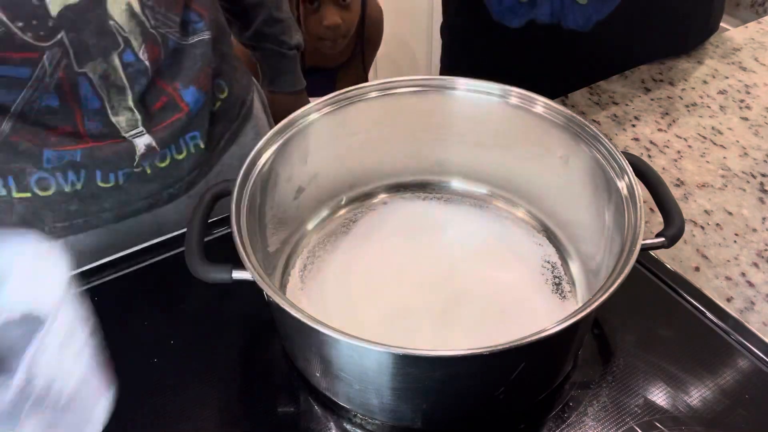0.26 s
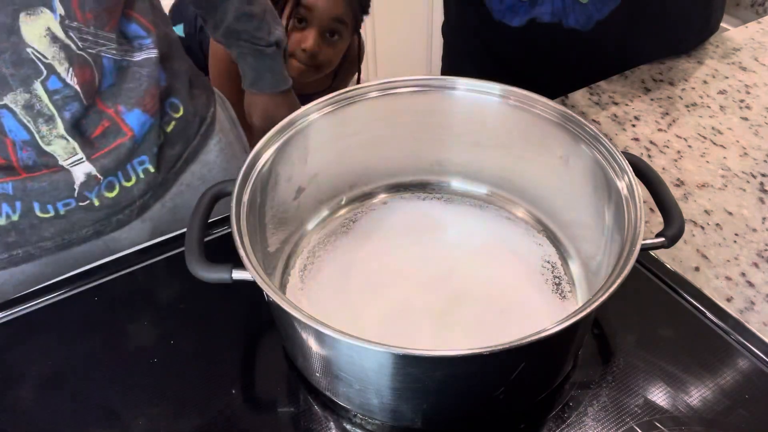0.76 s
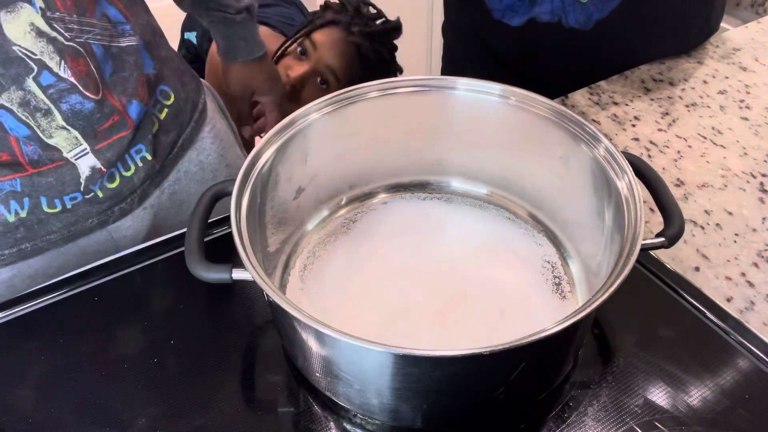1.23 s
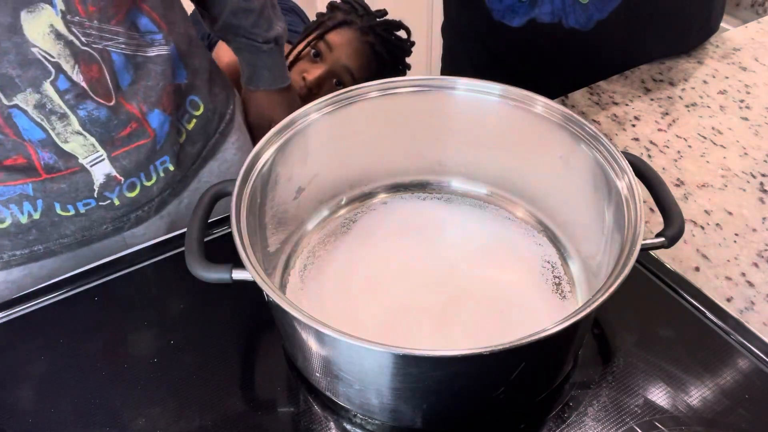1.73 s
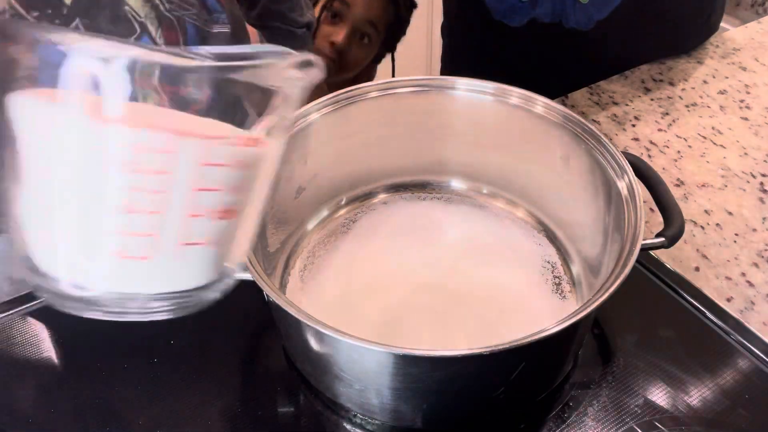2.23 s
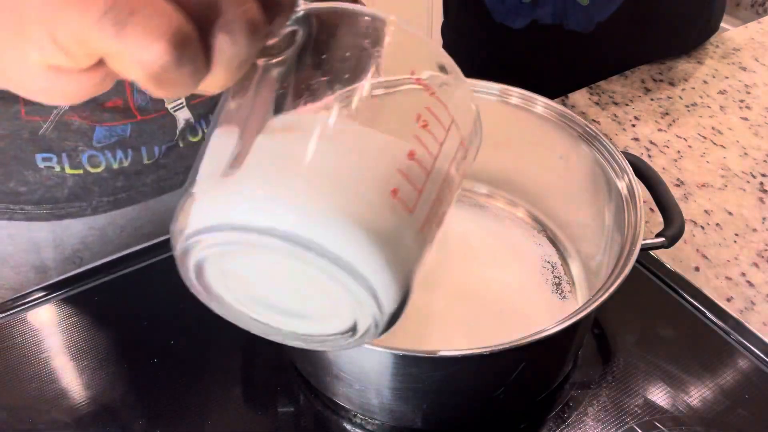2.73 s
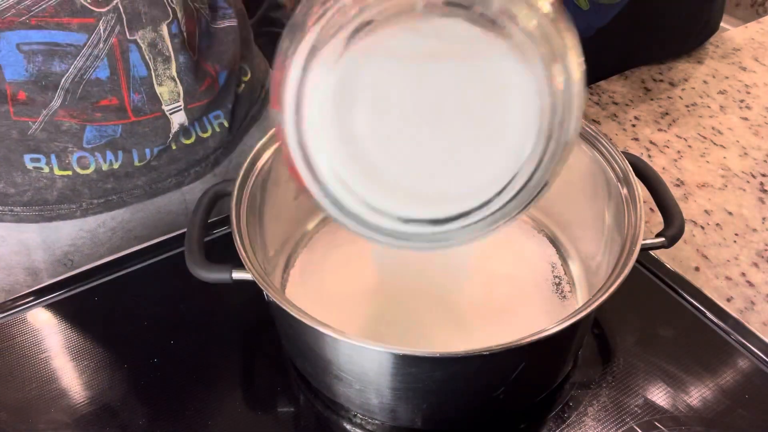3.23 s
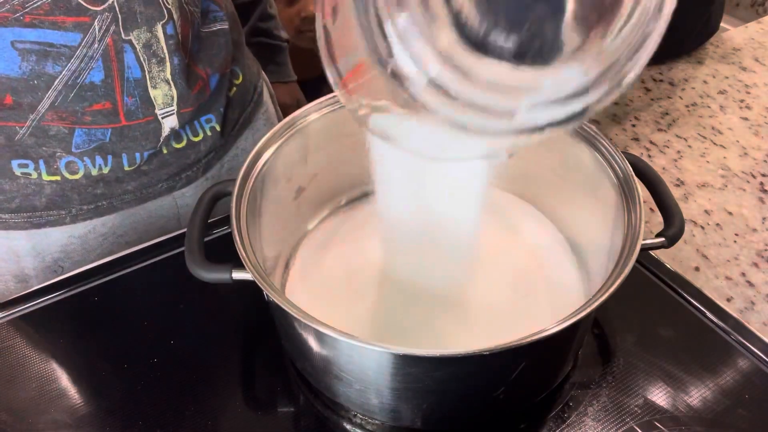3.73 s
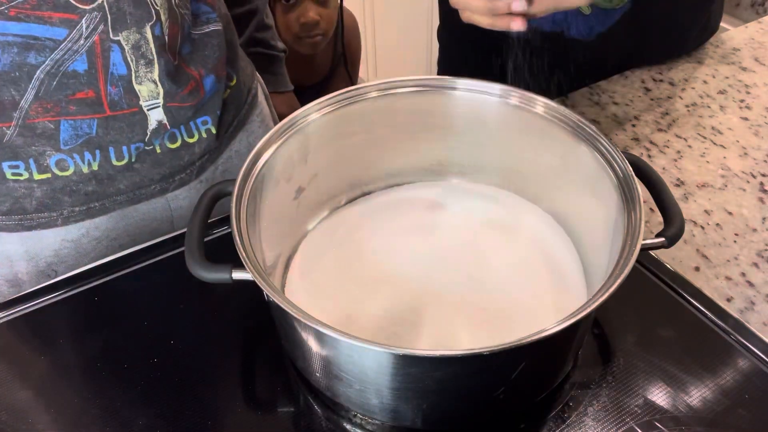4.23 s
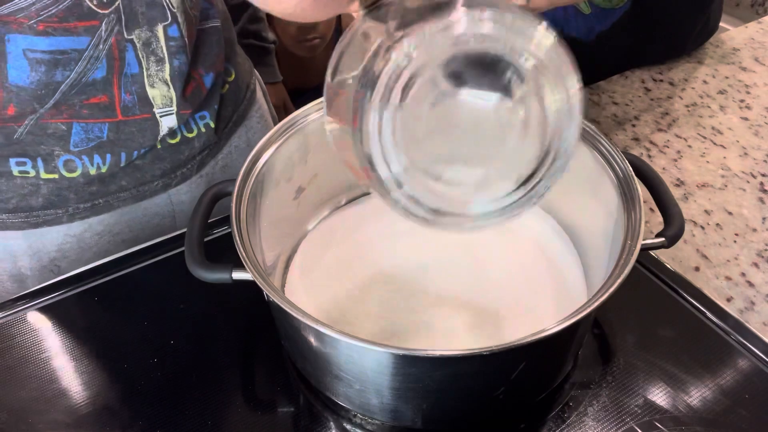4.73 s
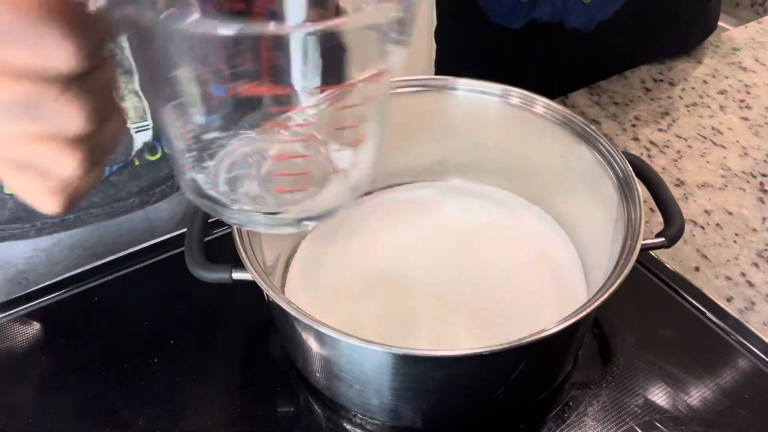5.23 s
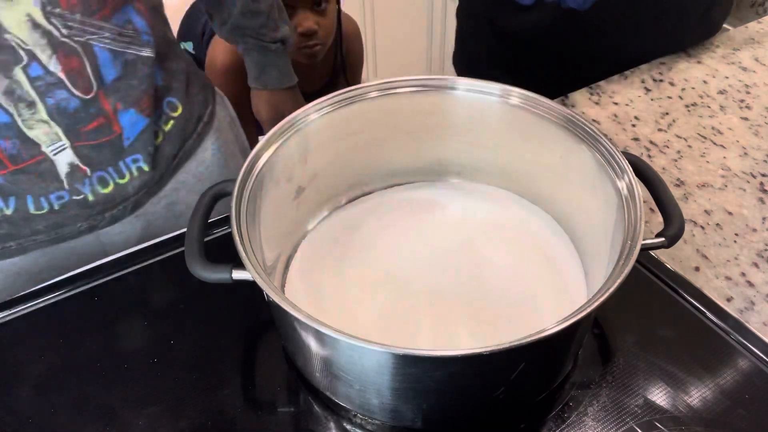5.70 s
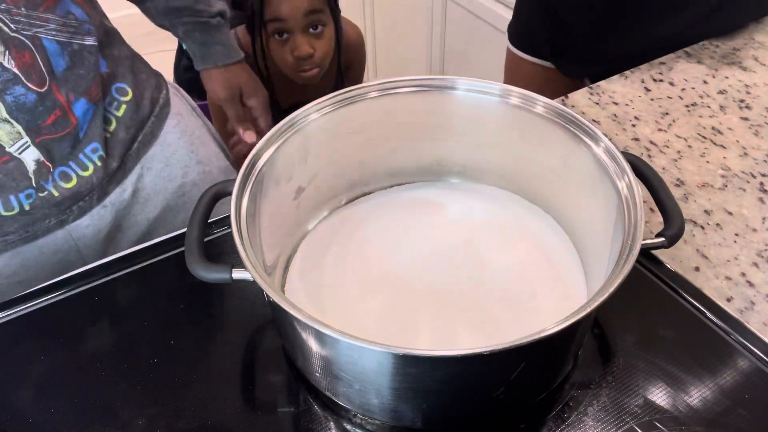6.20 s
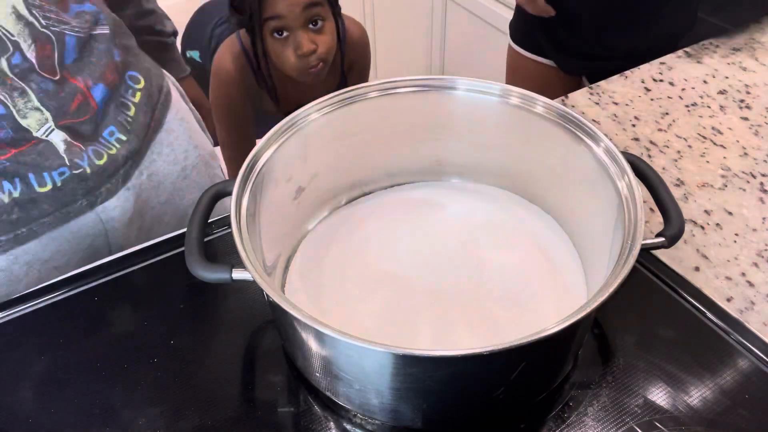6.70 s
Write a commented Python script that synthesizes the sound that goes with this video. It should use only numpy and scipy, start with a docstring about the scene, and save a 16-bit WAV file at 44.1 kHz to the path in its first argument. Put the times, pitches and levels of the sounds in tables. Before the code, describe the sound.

Beside a stove, a low fan drone glides slightly upward and grows stronger and airier. Early on, a light plastic cup knocks and bounces to the left. Faint taps and cloth rustle follow, then a bright, grainy stream of sugar swells and thins for under two seconds. Near the end, a glass cup lands on stone with hard double knocks, a rocking clink and short ring in a lively kitchen.

```python
"""In a small kitchen, sugar is poured from a glass cup onto sugar in a steel pot, beside a stove fan that speeds up.
First an empty plastic cup is put down and bounces; last, the glass cup knocks, rocks and rings on the stone counter.
Grains are sparse random impacts; knocks are noise bursts that drive a coloured body, with decaying modes as the ring.
The fan is coloured noise with gliding tones. Clothes rustle, handling taps, and thin squeaks are faint."""
import sys
import numpy as np
from scipy import signal
from scipy.fft import rfft, irfft, next_fast_len
from scipy.io import wavfile
from scipy.ndimage import uniform_filter1d, minimum_filter1d

SR = 44100
rng = np.random.default_rng(int(sys.argv[2]) if len(sys.argv) > 2 else 0)


def to_wav(s):
    """Save 16-bit WAV."""
    ch = np.atleast_2d(s).T  # columns
    pcm = np.round(np.clip(ch, -1, 1) * 32767)  # PCM
    wavfile.write(sys.argv[1], SR, pcm.astype(np.int16))


N = 306936
TIME = np.arange(N) / SR
AGE = TIME[:SR]   # seconds since a blow
EAR_DELAY_S = .00043   # between the ears, for a sound from one side

# Stereo width of knocks, taps and cloth. Each row: frequency in Hz, side relative to mid in dB.
KNOCK_WIDTH = [(60, -13.5), (170, -11), (400, -2.5), (750, 5.5), (1050, -3), (1400, 4.5), (3500, -1.5),
               (8000, 7), (12000, -14.5)]


def sugar(lumps_db, lumps_per_s):
    """Granular impact noise: crystals strike a soft heap; when the stream thickens, some ring the steel."""
    # Colour of the grains. Each row: frequency in Hz, relative level in dB per Hz.
    grain_spectrum = [(1500, -18), (3200, -6), (5000, 2.5), (7500, -5.5), (9000, -3), (11000, -1.5),
                      (15000, 3), (16500, -1.5)]
    # Resonances of the pot rung by the grains. Each row: centre in Hz, width in Hz, gain in dB.
    pot = [(8100, 150, 5), (9850, 320, 12), (10660, 940, 11), (11940, 320, 11)]
    width = [(3000, -9), (8000, 8.5), (12000, -15)]   # (Hz, side minus mid dB)
    # the stream opens and closes in one arch as the cup tips
    start_s, length_s, pour_db, arch_power = 2.68, 1.77, -77.5, 0.6
    tipped = np.clip((TIME - start_s) / length_s, 0, 1)
    arch = abs(np.sin(np.pi * tipped)) ** arch_power
    # part way through, the heap in the cup slides and the stream thickens for a moment
    slide_s, rise_s, fade_s, slide_db = 3.34, 0.13, 1, 5
    slide = np.interp(TIME - slide_s, [0, rise_s, rise_s + fade_s], [0, 1, 0])
    flow = arch * from_db(slide_db * slide + lumps_db * drift(lumps_per_s))
    crystals = grains(per_s=8700)
    heap = colour(crystals, grain_spectrum, width)
    steel = colour(crystals, grain_spectrum, width, pot)
    return from_db(pour_db) * flow * ((1 - slide) * heap + slide * steel)


def grains(per_s):
    """Shot noise: tiny impacts at random times and of uneven size, scaled to unit power."""
    struck = rng.random((2, N)) < per_s / SR
    return rms_one(white(N) * struck)


def glass_cup():
    """Impact excitation: glass on stone, first held firmly, then let go, so that it rings more."""
    # Contacts with the counter. Each row: start in seconds, knock level in dB, knock tilt in dB per octave,
    # knock t60 in seconds, tail in dB relative to the knock, ring level in dB, ring tilt in dB per octave.
    hits = [(6.2785, -22, -0.5, 0.047, -17, -64, -4), (6.2848, -6.5, -1.5, 0.039, -17.5, -54.5, 4.5),
            (6.3238, -6, 0.6, 0.045, -24.5, -50.5, 4), (6.4925, -16, 0.5, 0.094, -15, -41, 2),
            (6.516, -22, -0.2, 0.091, -13.5, -36, -1.5)]
    # Colour of the knock. Each row: frequency in Hz, relative level in dB per Hz.
    knock_spectrum = [(45, -28), (105, 1.5), (165, 5), (260, -2.5), (400, -0.5), (600, -5.5), (730, 2),
                      (1150, -7.5), (2200, -6), (3500, -13), (4500, -21.5), (5300, -31), (6500, -39),
                      (8500, -74), (15000, -55)]
    # Resonances and dips of the counter and of the glass base pressed on it.
    # Each row: centre in Hz, width in Hz, gain in dB.
    counter_peaks = [(566, 44, -15), (767, 140, 5.5), (998, 17, 10), (1242, 22, 8.5), (1390, 150, 8.5),
                     (1720, 33, -18), (1866, 29, 6.5), (2097, 32, 9), (3030, 48, 2.5), (3490, 240, 7.5),
                     (4120, 180, -2.5), (4420, 140, 9), (9850, 1550, 43.5), (11900, 410, 35),
                     (13500, 220, 26)]
    # Modes of the cup. Each row: frequency in Hz, relative level in dB, t60 in seconds.
    modes = [(755, -21, 0.35), (895, 0.5, 0.5), (1424, -2, 0.91), (2090, -7, 0.41), (3058, -6, 0.47),
             (3523, 3, 0.63), (3770, 0.5, 0.41), (4543, -1, 0.47), (5730, -23, 0.69), (6710, -11, 0.23),
             (8021, -20.5, 0.18), (9820, -7, 0.33), (10310, -1, 0.14), (11720, -5.5, 0.24),
             (11800, -11, 0.18), (13430, -14, 0.2)]
    return set_down(hits, knock_spectrum, counter_peaks, modes, attack_s=0.0027, hold_s=0.004,
                    crack_db=-6, crack_t60=0.022, shimmer_db=-1.5)


def plastic_cup():
    """Repeated impact: an empty plastic cup bounces on the counter, and its walls colour each knock."""
    # Contacts with the counter. Each row: start in seconds, knock level in dB, knock tilt in dB per octave,
    # knock t60 in seconds, tail in dB relative to the knock, ring level in dB, ring tilt in dB per octave.
    hits = [(.5499, -23, 0, 0.044, -20, -34, -2.5), (.562, -32, -1, .06, -19.5, -37.5, -3.5),
            (.6210, -34.5, -2.1, 0.065, -19, -48, 6), (.681, -34, -2.5, 0.085, -19.5, -49, 2)]
    # Colour of the knock. Each row: frequency in Hz, relative level in dB per Hz.
    knock_spectrum = [(50, -12), (165, 3), (280, 1.5), (520, -6), (880, 3.5), (1300, -8), (2000, -11.5),
                      (2700, -16.5), (3400, -18), (4500, -22), (5700, -25.5), (7200, -26), (11500, -23.5),
                      (16000, -35.5)]
    # Resonances of the plastic walls. Each row: centre in Hz, width in Hz, gain in dB.
    walls = [(1150, 110, 2), (1606, 82, 5.5), (3320, 250, 7), (5120, 340, 4), (5750, 340, 10)]
    # Modes of the cup. Each row: frequency in Hz, relative level in dB, t60 in seconds.
    modes = [(174.8, 7.5, 0.17), (715, -15, 0.48), (853, 3.5, 0.13), (917, -11.5, 0.47), (1111, -8.5, 0.27),
             (1432, -14, 0.33), (1598, -2, 0.13), (3350, -13, 0.2)]
    return set_down(hits, knock_spectrum, walls, modes, attack_s=0.0006, hold_s=0.00096,
                    crack_db=8.5, crack_t60=0.014, shimmer_db=0.0)


def set_down(hits, spectrum, peaks, modes, attack_s, hold_s, crack_db, crack_t60, shimmer_db):
    """Impact and modal decay: each contact gives a crack, a dense knock, a fresh ring and a room tail."""
    out = np.zeros((2, N))
    # the cup lands on one spot, so counter and kitchen answer every contact alike
    counter, kitchen = white(SR), room_tail(white(SR))
    for s, knock_db, tilt_db, knock_t60, tail_db, ring_db, ring_tilt_db in hits:
        # the knock holds briefly before it dies
        held_decay = np.minimum(dying(knock_t60) * np.exp(np.log(1000) * hold_s / knock_t60), 1)
        thud = held_decay * (1 - np.exp(-AGE / attack_s))
        # the first instant of contact is the brightest: differencing lifts the treble
        crack = from_db(crack_db) * np.diff(white(SR + 1)) * dying(crack_t60)
        drive = even(counter * thud) + crack + from_db(tail_db) * kitchen
        knock = colour(drive, spectrum, KNOCK_WIDTH, peaks, tilt_db, lag=-0.7)
        ring = np.zeros((2, SR))
        for hz, db, t60 in modes:
            mode_db = db + ring_tilt_db * np.log2(hz / 1000)
            ring += from_db(mode_db) * ringing(hz, t60, shimmer_db)
        add(out, s, from_db(knock_db) * knock + from_db(ring_db) * ring)
    return out


def even(burst):
    """Spectral whitening: broad humps are levelled, so that the struck body gives the burst its colour."""
    lines = rfft(burst, 2 * SR)
    humps = np.sqrt(uniform_filter1d(abs(lines) ** 2, size=301))
    return rms_one(irfft(lines / humps)[:, :SR]) * np.std(burst)


def ringing(hz, t60, shimmer_db):
    """Modal decay: the direct ring of one mode fades first and leaves its wavering reflections."""
    direct = np.exp(2j * np.pi * rng.random()) * np.array([[1], [1j]]) * dying(t60 / 2)
    reflected = from_db(shimmer_db) * shimmer(rate=25 + hz / 200) * dying(t60)
    mid, side = np.real((direct + reflected) * np.exp(2j * np.pi * hz * AGE)) * (1 - dying(0.016))
    return mid + side * from_db(at_hz(KNOCK_WIDTH, hz)) * np.array([[1], [-1]])


def shimmer(rate):
    """Interference: reflections of a tone add with wandering phase, in two unrelated signals of unit power."""
    knots = rng.standard_normal((2, 1024)) + 1j * rng.standard_normal((2, 1024))
    wandering = np.array([np.interp(AGE * rate, np.arange(len(k)), k) for k in knots])
    return wandering * np.sqrt(3 / 4)   # offsets the unit knots' power of 2 and the interpolation loss


def room_tail(noise):
    """Reverberation: reflections build up within milliseconds and die octave by octave."""
    # Decay of the kitchen. Each row: frequency in Hz, t60 in seconds.
    kitchen_t60 = [(100, 0.37), (700, 0.56), (3000, 0.79), (7000, 0.41), (14000, 0.33)]
    octave = np.clip(np.log2((np.fft.rfftfreq(SR, 1 / SR) + 1) / 125), 0, 7)
    lines = rfft(noise)
    tail = np.zeros((2, SR))
    for k in range(8):
        band = irfft(lines * np.maximum(1 - abs(octave - k), 0), SR)
        tail += band * dying(at_hz(kitchen_t60, 125 * 2 ** k))
    return tail * (1 - dying(0.017))


def fan(waver, lag):
    """Aeroacoustics: turbulence rumbles, air rushes and flutters in the duct, blade tones climb with speed."""
    # Rumble, then rushing air, then its fluttering band.
    # Each row: frequency in Hz, relative level in dB per Hz.
    rumble = [(25, -32.5), (42, -25), (54, -12), (68, -14.5), (100, -8), (165, 0), (240, -1.5), (300, -8),
              (375, -1), (425, -20), (520, -22.5), (640, -29), (900, -80.5)]
    air = [(450, -19.5), (650, -17), (750, 3), (1000, -7), (1350, -16.5), (1750, -12), (2400, -10.5),
           (3000, -20.5), (4500, -24), (6500, -34.5), (8000, -56.5), (11500, -46.5)]
    flutter = [(1500, -40.5), (2000, -6.5), (2150, -2), (2300, -16.5), (2550, -4), (3100, -45)]
    # Resonances of the air duct. Each row: centre in Hz, width in Hz, gain in dB.
    duct = [(1185, 110, 10), (1513, 49, 12), (2152, 81, 12), (2500, 260, 2.5), (3210, 25, 10.5),
            (3440, 37, 10.5)]
    # Stereo width of the noise. Each row: frequency in Hz, side relative to mid in dB.
    fan_width = [(50, -13.5), (110, -13.5), (190, -6), (280, -0.5), (370, -5), (470, 12), (640, 7.5),
                 (850, 0.5), (1750, 0.5), (2150, -4.5), (3000, -0.5), (9000, 1.5)]
    # Tones. Each row: share of the blade pitch, dB relative to the blade level, radians between the ears.
    tones = [(.375, -10.5, 0.46), (.747, -10, 1.6), (1, -1, 2.416)]
    # Growth of the noise. Each row: time in seconds, gain in dB.
    swell = [(1.4, -1.1), (2.7, 0.5), (3.15, 4.5), (4.3, 6.5), (5.9, 10.5), (6.96, 9.5)]
    # Blade level. Each row: time in seconds, level in dB.
    blade_level = [(1.2, -47), (2.5, -50.5), (3.6, -44.5), (4.8, -50), (5.8, -40)]
    # the fan is switched up a step: its blade tone climbs and settles
    speed_up_s, settle_s, slow_hz, fast_hz = 1.7, 1.2, 468, 497.8
    rumble_db, air_db, flutter_db = -47, -68.5, -81.5   # before the swell
    flutter_depth_db, flutters_per_s = 6, 68

    lagging = np.exp(-np.maximum(TIME - speed_up_s, 0) / settle_s)
    blade_hz = fast_hz + (slow_hz - fast_hz) * lagging
    swell_db, blade_db = in_time(swell), in_time(blade_level)
    out = from_db(rumble_db + swell_db) * colour(white(N), rumble, fan_width, lag=lag)
    turns = np.cumsum(blade_hz * (1 + waver * drift(17))) / SR
    for share, db, apart in tones:
        phase = 2 * np.pi * share * turns + apart * np.array([[-.5], [.5]])
        out += from_db(blade_db + db + 1.1 * drift(11)) * np.sin(phase)
    fluttering_db = flutter_db + swell_db + flutter_depth_db * drift(flutters_per_s)
    out += from_db(fluttering_db) * colour(white(N), flutter, fan_width, lag=lag)
    rushing_db = air_db + swell_db + 1.1 * drift(30)
    return out + from_db(rushing_db) * colour(white(N), air, fan_width, duct, lag=lag)


def clothes(flutter_db):
    """Stick-slip friction: fibres catch and slip as the arm moves, and each movement swells and fades."""
    # Arm movements. Each row: peak time in seconds, peak level in dB, rise in dB per second,
    # fall in dB per second, tilt in dB per octave.
    rustles = [(0.41, -67, 118.5, 41.5, 6.5), (2.17, -78, 151, 110, 4.5), (5.5, -79, 63.5, 63, 5),
               (6.13, -67.5, 33, 18, -1), (6.8, -61, 909, 112, -4)]
    # Colour of the cloth. Each row: frequency in Hz, relative level in dB per Hz.
    cloth = [(1500, 3.5), (3500, 4.5), (6000, -1), (8000, -8), (11500, -0.5), (15500, -11)]
    out = np.zeros((2, N))
    fibres = grains(per_s=21000) * from_db(flutter_db * drift(20))
    for s, db, rise, fall, tilt_db in rustles:
        rubbing = from_db(db - rise * np.maximum(s - TIME, 0) - fall * np.maximum(TIME - s, 0))
        out += rubbing * colour(fibres, cloth, KNOCK_WIDTH, tilt_db=tilt_db)
    return out


def taps(t60, room_db, width_hz, resonance_db):
    """Damped resonance: fingers and utensils give short ticks, dull or bright, each with its own peak."""
    # Taps of handling. Each row: start in seconds, level in dB, tilt in dB per octave, resonance in Hz.
    ticks = [(0.32, -63, 5, 5830), (1.134, -75.5, 12.5, 10300), (1.582, -58, 3, 3000),
             (1.221, -79, 10, 11400), (2.088, -52, -5, 2820), (2.13, -62, 2.5, 2600),
             (4.275, -74.5, 12, 10100), (4.719, -56, -6, 1385), (5.789, -60, 10, 5000),
             (5.805, -50.5, 4.5, 3320), (5.846, -55.5, 3, 4280), (6.792, -65, 8, 6400)]
    # Colour of a tap. Each row: frequency in Hz, relative level in dB per Hz.
    tap_spectrum = [(100, -87), (800, -26), (1500, 2.5), (2900, 0.5), (5000, -8), (8000, -16), (12000, -14),
                    (16000, -40)]
    out = np.zeros((2, N))
    envelope = (dying(t60) + from_db(room_db) * dying(0.24)) * (1 - dying(0.0027))
    for s, db, tilt_db, hz in ticks:
        peak = [(hz, width_hz, resonance_db)]
        add(out, s, from_db(db) * colour(white(SR) * envelope, tap_spectrum, KNOCK_WIDTH, peak, tilt_db))
    return out


def squeaks():
    """Frequency modulation: faint thin whistles hold or chirp upward, with wandering phase and level."""
    # Each row: start in seconds, length in seconds, mid pitch in Hz, level in dB, glide as a share of the pitch.
    whistles = [(2.006, 0.088, 3670, -70.5, 0.025), (2.237, 0.18, 3600, -73, 0.0022),
                (4.029, 0.05, 3070, -64, 0.17)]
    out = np.zeros((2, N))
    for s, length, hz, db, glide in whistles:
        along = np.minimum(AGE / length, 1)
        tone = np.exp(2j * np.pi * np.cumsum(hz * (1 + glide * (along - .5))) / SR)
        add(out, s, from_db(db) * np.sin(np.pi * along) * np.real(tone * shimmer(rate=74)))
    return out


def colour(noise, spectrum, width, peaks=(), tilt_db=0, lag=0):
    """Source-filter principle: two noises drive a body and become left and right.

    A lag from -1 to 1 makes the left ear early or late."""
    size = next_fast_len(noise.shape[1] // 2 + 1) * 2
    hz = np.fft.rfftfreq(size, 1 / SR)
    db = at_hz(spectrum, hz) + tilt_db * np.log2(np.maximum(hz, 100))
    for centre, wide, peak_db in peaks:
        db = db + peak_db / (1 + (2 * (hz - centre) / wide) ** 2)
    # minimum phase: the body only rings after it is driven
    cepstrum = irfft(np.log(rms_one(from_db(db))))
    body = np.exp(2 * rfft(cepstrum[:size // 2], size) - cepstrum[0])
    mid, side = rfft(noise, size) * body
    # a side signal a quarter turn from the mid delays one ear
    lag = np.clip(lag, -1, 1) * np.sin(2 * np.pi * hz * EAR_DELAY_S)
    side = np.sqrt(1 - lag ** 2) * side - 1j * lag * mid
    side = side * from_db(at_hz(width, hz))
    mid, side = irfft([mid, side], size)[:, :noise.shape[1]]
    return np.array([mid + side, mid - side])


def white(size):
    """White noise: two unrelated signals with a flat spectrum."""
    return rng.standard_normal((2, size))


def drift(rate):
    """Random modulation: chance values of unit spread, rate per second, joined by straight lines."""
    knots = rng.standard_normal(4096)
    return np.interp(TIME * rate, np.arange(len(knots)), knots)


def dying(t60):
    """Exponential decay: an envelope that falls by 60 dB in t60 seconds."""
    return np.exp(-np.log(1000) * AGE / t60)


def in_time(rows):
    """Linear interpolation: a curve at every sample."""
    return np.interp(TIME, *np.transpose(rows))


def at_hz(points, hz):
    """Logarithmic pitch scale: read a table on a log-frequency axis."""
    f, value = np.transpose(points)
    return np.interp(np.log(hz + 1), np.log(f), value)


def from_db(db):
    """Logarithmic level scale: decibels to gain."""
    return 10 ** (np.asarray(db) / 20)


def rms_one(x):
    """Power normalisation: scale to unit power."""
    return x / np.sqrt(np.mean(x ** 2) + 1e-20)


def pan(x, left_db):
    """Level difference between the ears: lean a sound to the left by left_db in all."""
    return x * from_db([[left_db / 2], [-left_db / 2]])


def add(out, s, sound):
    """Superposition: mix a sound in at s seconds."""
    start = round(s * SR)
    out[:, start:start + SR] += sound[:, :N - start]


def limiter(x, release_db_per_s):
    """Gain reduction: peaks above 0.9 push the gain down just ahead of them; it then creeps back."""
    over_db = np.maximum(20 * np.log10(abs(x).max(axis=0) / .9 + 1e-9), 0)
    release_db = release_db_per_s * TIME
    held_db = np.maximum.accumulate(over_db + release_db) - release_db
    # 89 samples are about 2 ms, centred on the peak
    return x * from_db(uniform_filter1d(minimum_filter1d(-held_db, size=89), size=89))


def scene():
    """Superposition of sources: both cups are put down to the left of the pot."""
    plastic = pan(plastic_cup(), left_db=0.5)
    glass = pan(glass_cup(), left_db=1.5)
    pour = sugar(lumps_db=-1.0, lumps_per_s=22)
    handling = taps(t60=0.064, room_db=-14.0, width_hz=660, resonance_db=8.0)
    background = fan(waver=0.002, lag=0.71) + clothes(flutter_db=1.5) + handling + squeaks()
    return pour + glass + plastic + background


def record(dry):
    """Limiting and low-pass filtering: high peaks are held down and the top is cut steeply."""
    cutoff_hz = 15800
    held = limiter(dry, release_db_per_s=14)
    low_pass = signal.ellip(10, .2, 80, cutoff_hz, fs=SR, output="sos")   # 0.2 dB ripple, 80 dB stop band
    return signal.sosfilt(low_pass, held)


dry = scene()
out = record(dry)
to_wav(out)
```